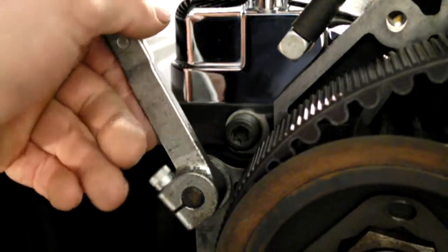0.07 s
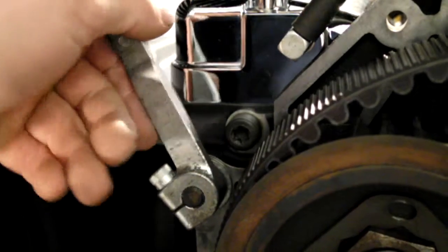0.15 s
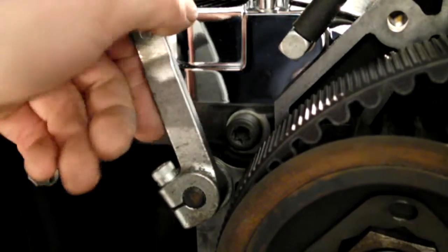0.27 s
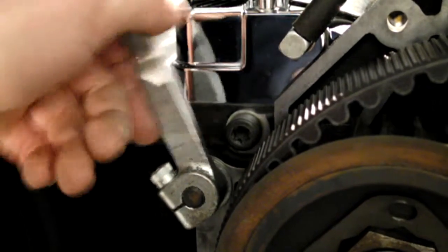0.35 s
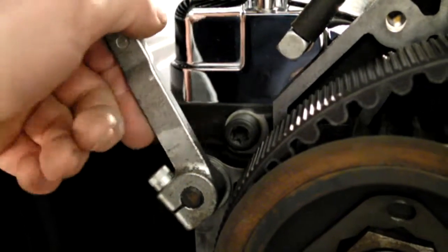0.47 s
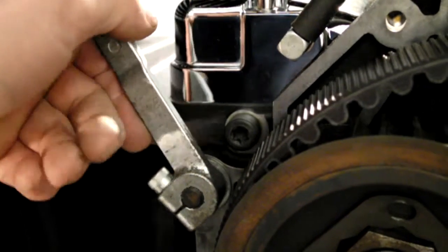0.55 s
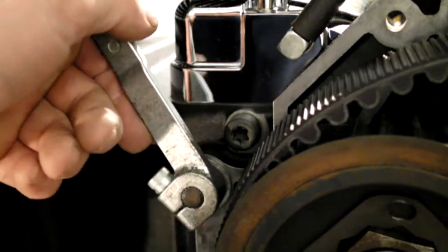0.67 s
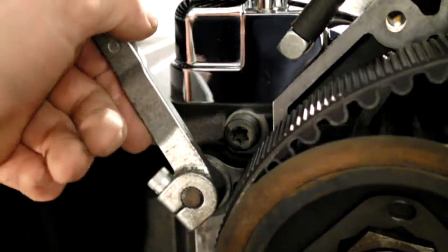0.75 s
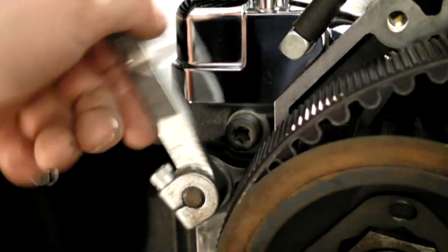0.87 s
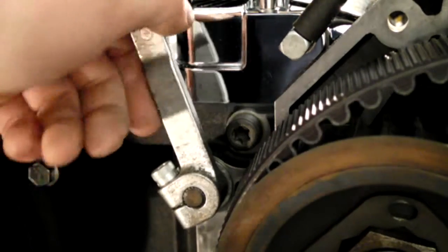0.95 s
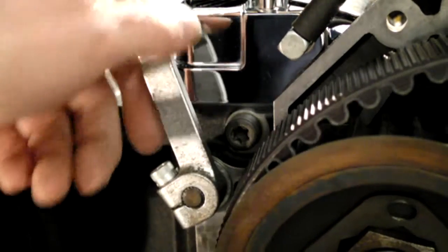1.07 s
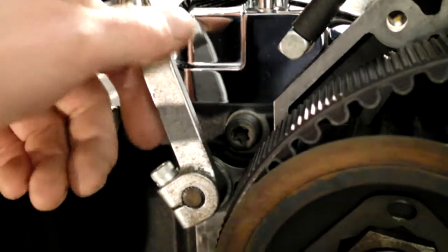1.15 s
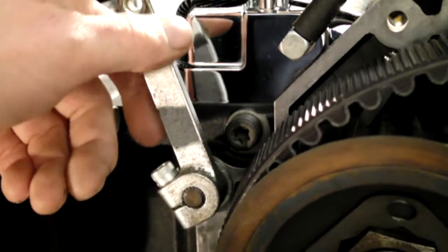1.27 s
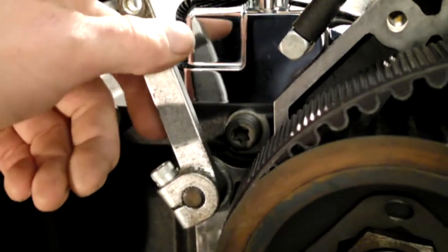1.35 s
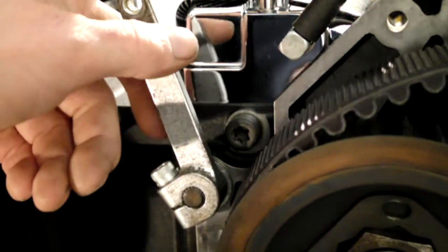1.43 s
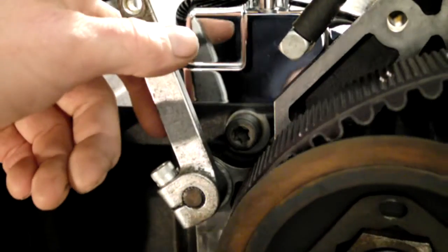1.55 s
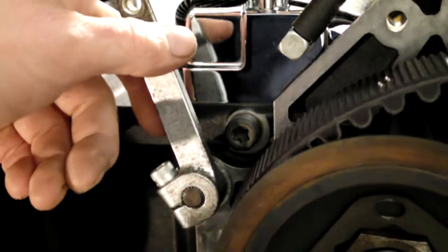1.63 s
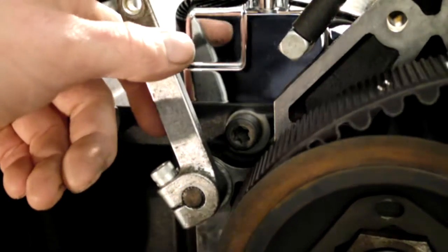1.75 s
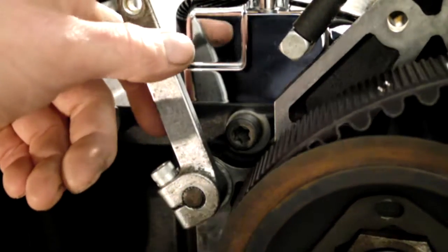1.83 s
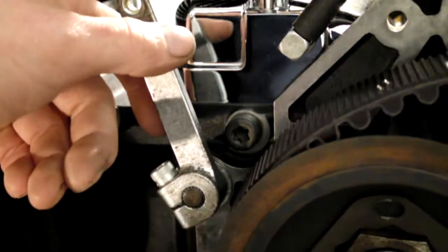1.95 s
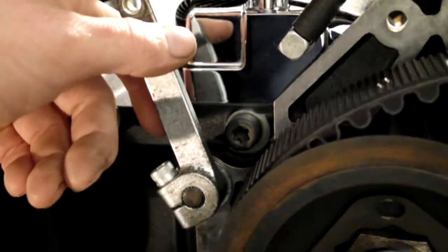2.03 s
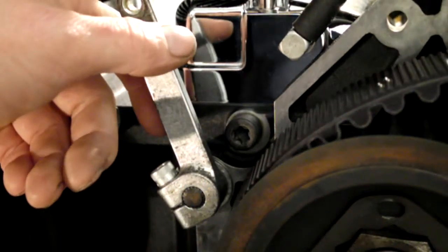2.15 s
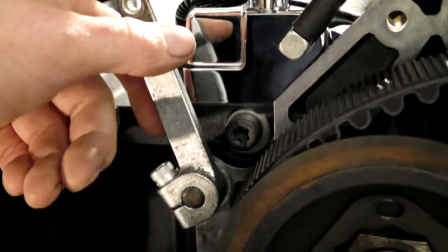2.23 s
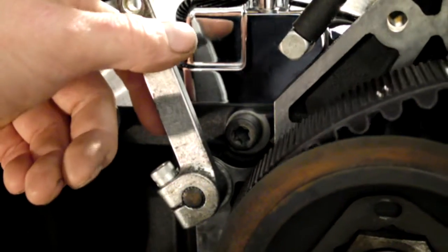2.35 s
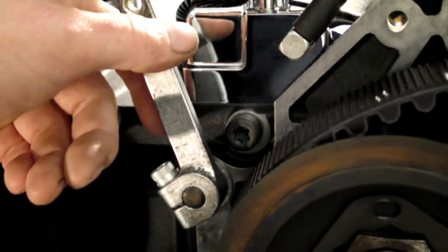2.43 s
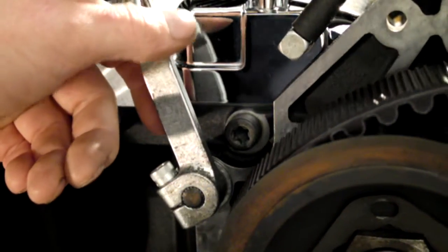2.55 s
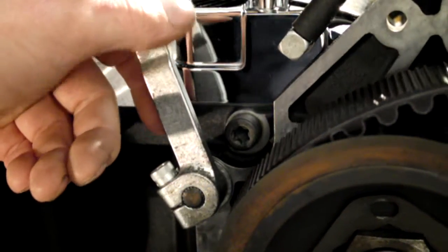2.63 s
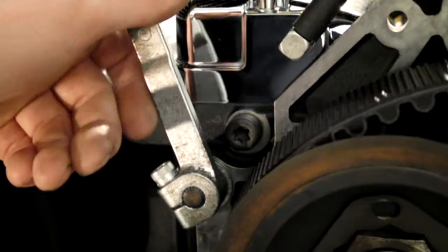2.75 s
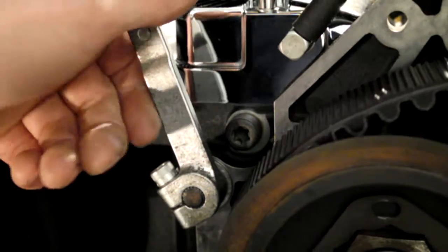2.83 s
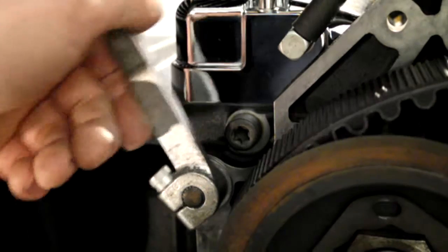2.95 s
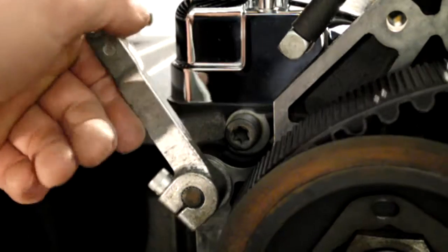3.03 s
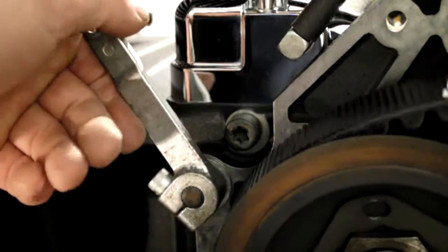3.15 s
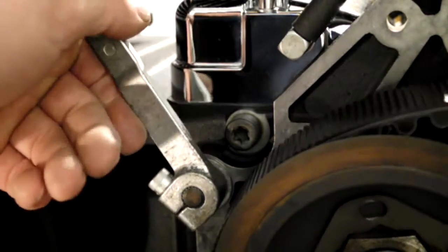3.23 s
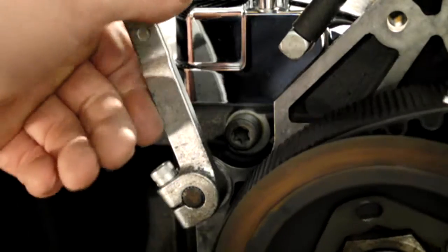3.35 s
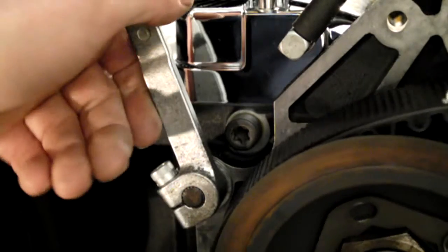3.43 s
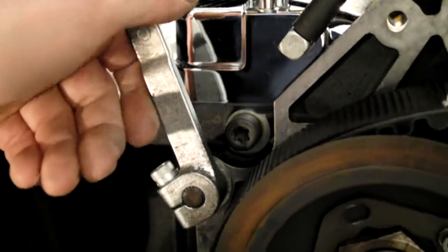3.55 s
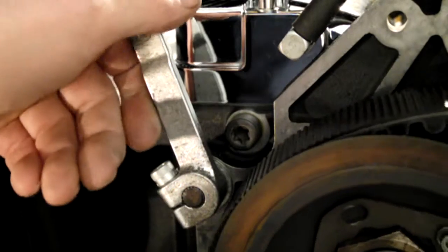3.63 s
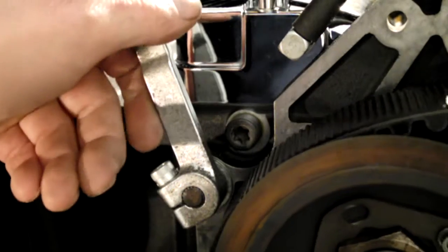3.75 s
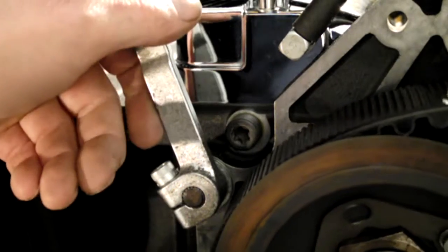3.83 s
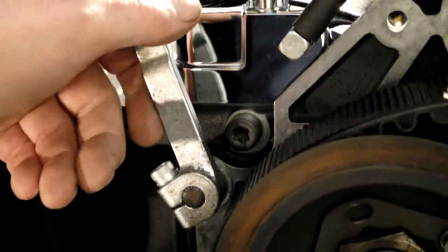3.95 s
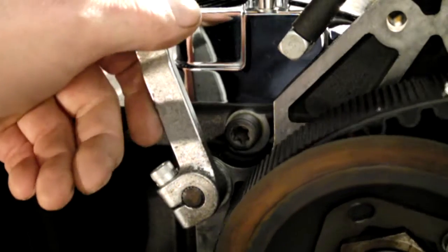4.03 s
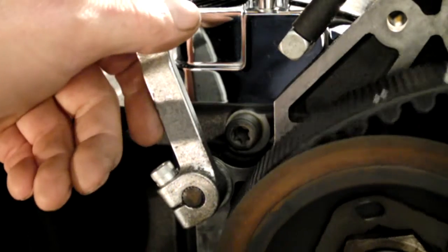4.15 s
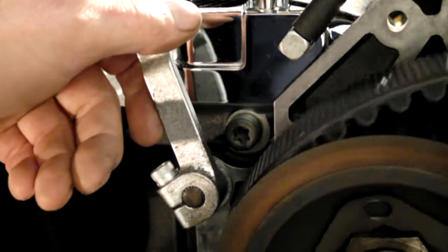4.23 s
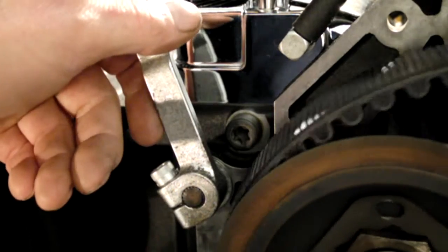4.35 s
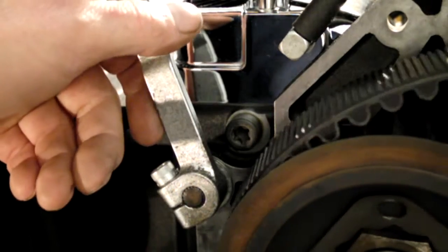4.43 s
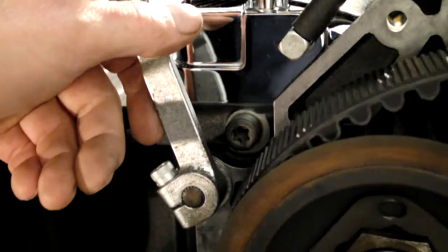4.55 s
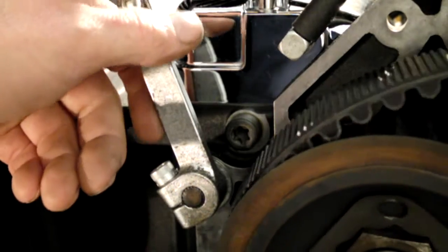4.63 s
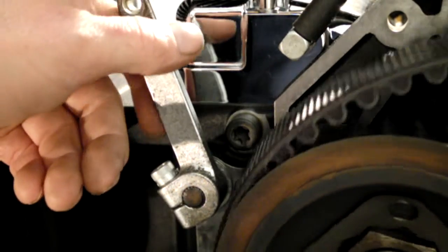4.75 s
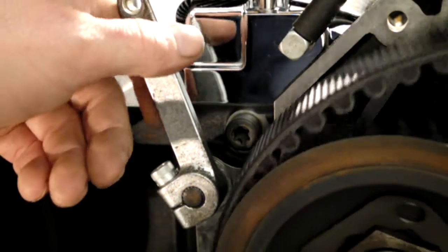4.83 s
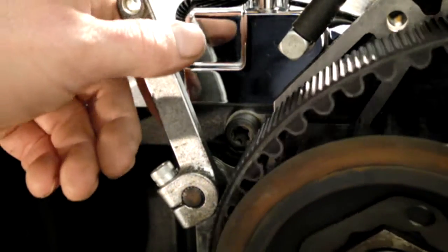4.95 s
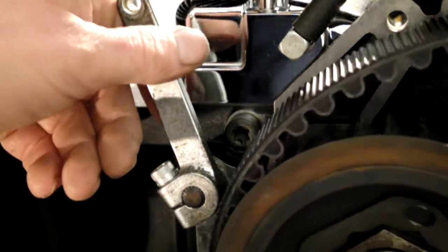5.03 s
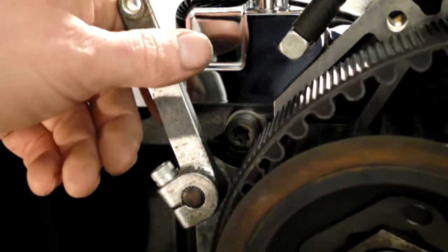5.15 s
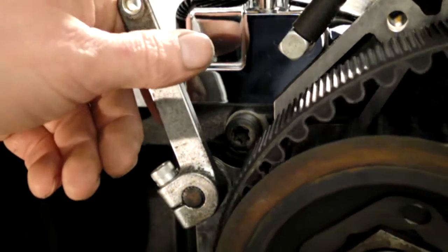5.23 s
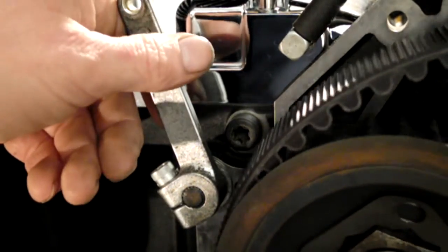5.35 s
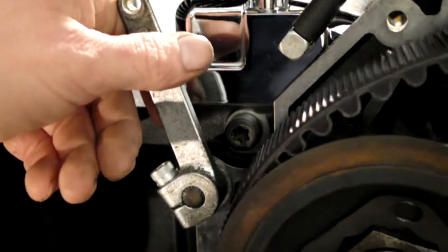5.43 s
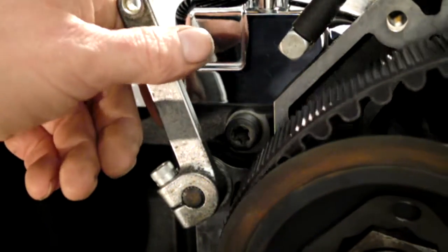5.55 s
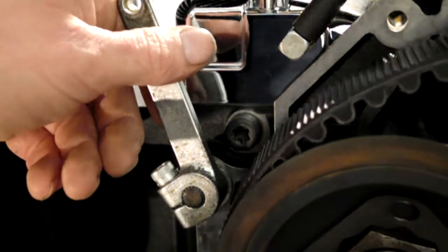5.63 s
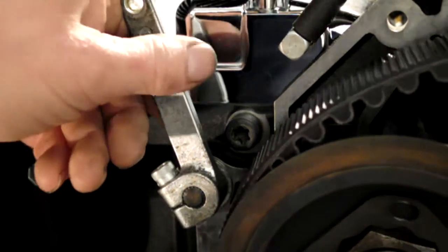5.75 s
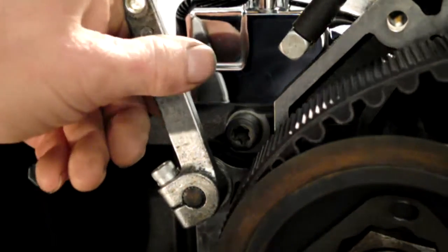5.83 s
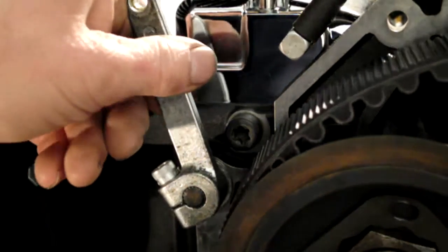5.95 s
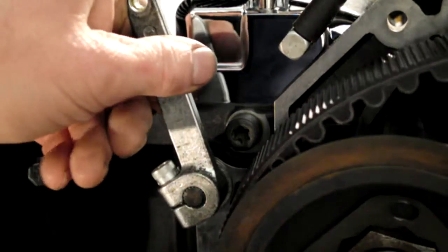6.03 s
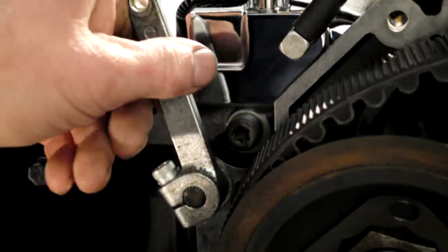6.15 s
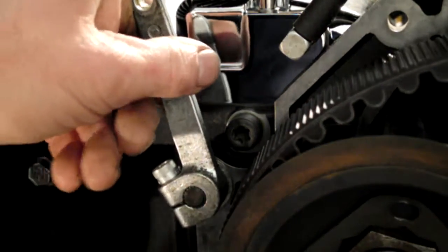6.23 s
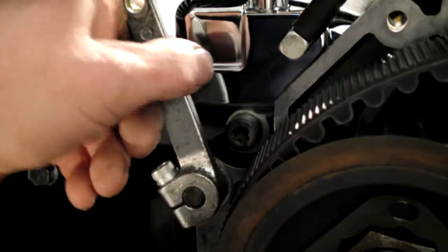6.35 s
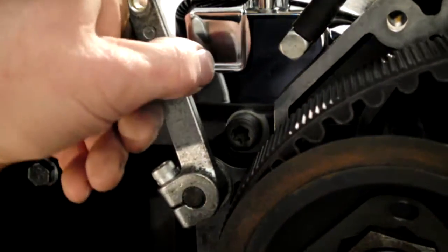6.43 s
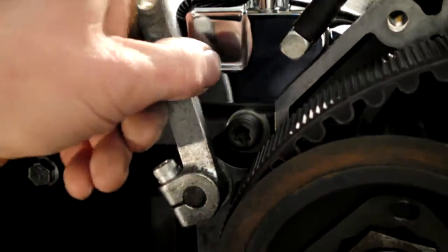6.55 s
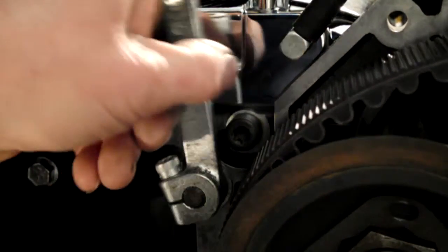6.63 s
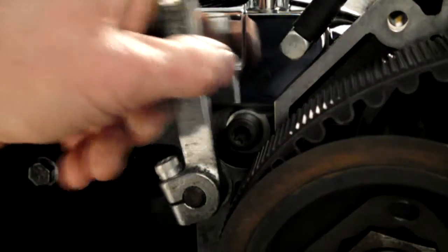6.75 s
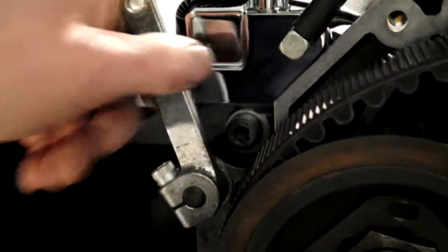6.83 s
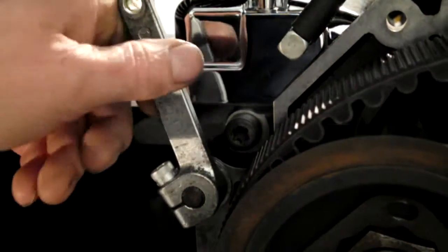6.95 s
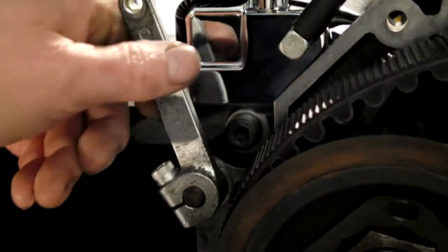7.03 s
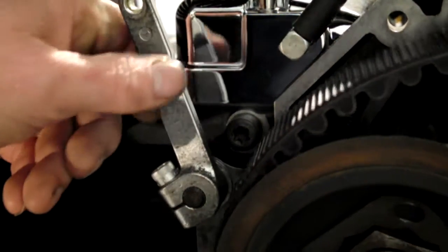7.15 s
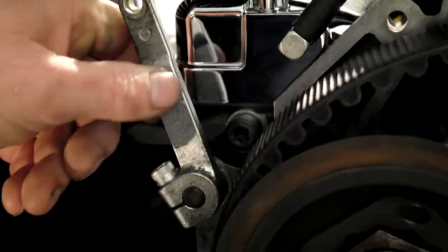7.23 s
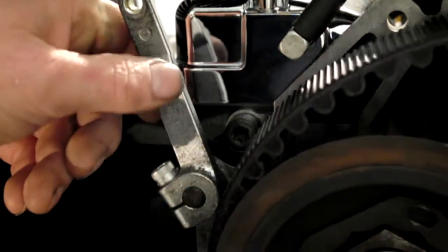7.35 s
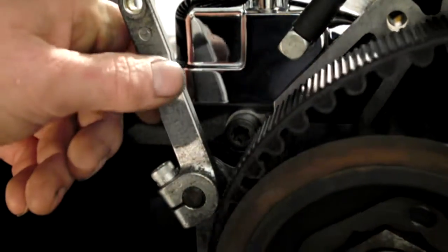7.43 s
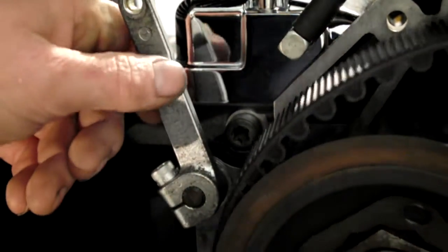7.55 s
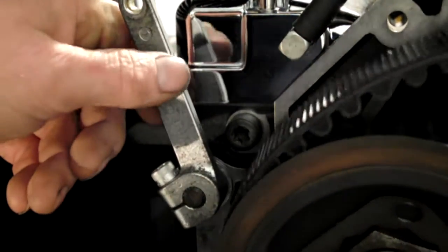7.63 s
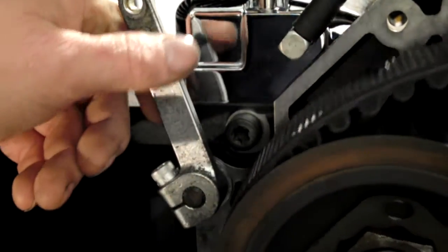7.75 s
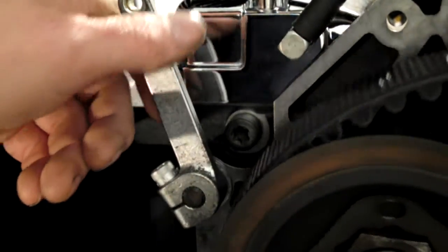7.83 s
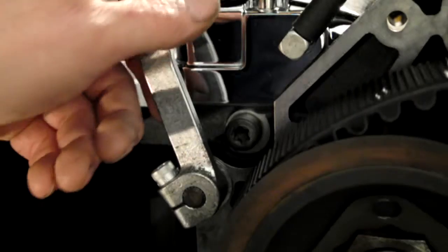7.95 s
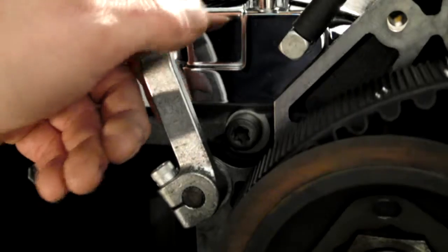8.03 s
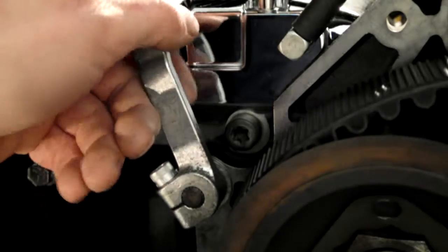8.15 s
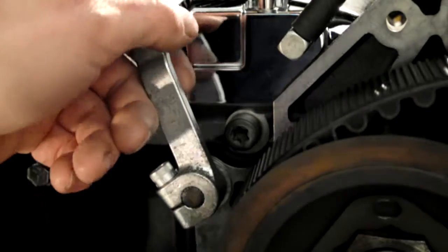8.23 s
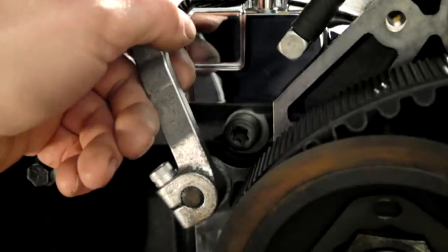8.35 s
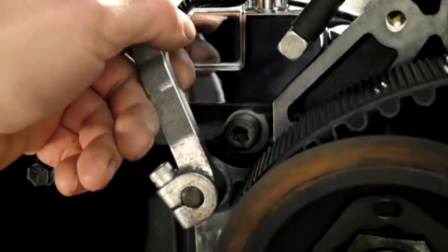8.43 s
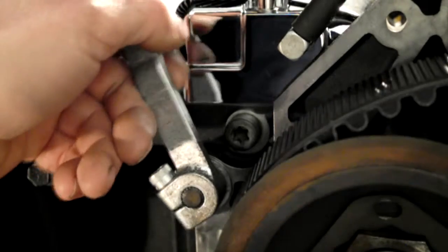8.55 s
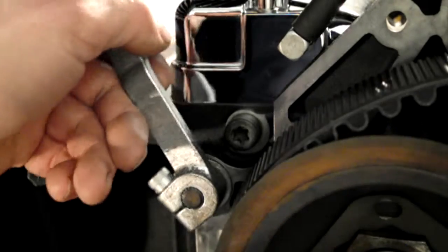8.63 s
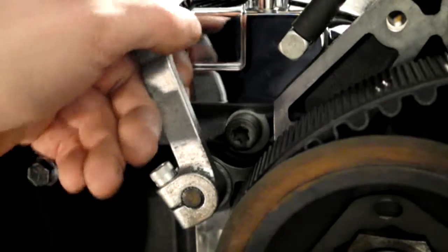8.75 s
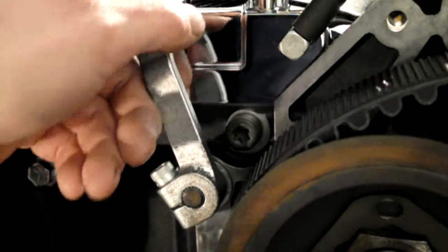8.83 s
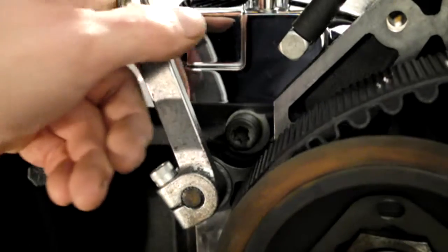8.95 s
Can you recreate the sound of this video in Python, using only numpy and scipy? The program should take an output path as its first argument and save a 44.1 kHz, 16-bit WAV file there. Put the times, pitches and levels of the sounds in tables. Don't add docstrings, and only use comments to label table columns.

```python
import sys
import numpy as np
from scipy import signal
from scipy.io import wavfile
from scipy.ndimage import uniform_filter1d

SR = 44100
rng = np.random.default_rng(int(sys.argv[2]) if len(sys.argv) > 2 else 0)


def wav_out(sig):
    wavfile.write(sys.argv[1], SR, np.round(np.clip(np.atleast_2d(sig).T, -1, 1) * 32767).astype(np.int16))


def natural_amplitude(level_db):
    exponent = np.asarray(level_db, float) / 20
    return 10 ** exponent


N = 396018

# (frequency [Hz], level [dB per Hz])
HISS_SPECTRUM = [(710, -17), (1200, -13), (1590, -16), (1810, -10.5), (2620, -2.5), (3250, -8),
                 (3950, -5.5), (14200, -10.5), (15200, -13.5), (16000, -37)]
RUMBLE_SPECTRUM = [(12, -41.5), (20, 0.5), (38, -5.5), (74, -8.5), (135, -18), (360, -21), (396, -18.5),
                   (428, -21.5), (550, -24.5), (1040, -29.5), (1260, -27), (1560, -43), (2000, -32.5),
                   (2600, -74), (4400, -120)]
# (frequency [Hz], pitch wander [Hz], level [dB])
HUM_LINES = [(70, .12, 2), (63.8, .12, -9), (42.5, .3, -10), (100, .1, -10), (116, .3, -16), (85, .3, -19),
             (150, 2, -19), (200, .2, -19), (300, .3, -26.5), (400, .4, -19.5)]
# (frequency [Hz], correlation [0-1])
PORT_LIKENESS = [(40, .93), (130, .9), (300, .92), (700, .85), (1400, .5), (3000, .05), (15000, .02)]
# (frequency [Hz], left over right [dB])
PORT_LEAN = [(40, 5.5), (250, 6.5), (950, 4), (3800, 2), (15000, 0)]
# (time [s], level [dB])
MACHINE_LOAD = [
    (0, -2),
    (1, 1.5),
    (2.5, 0.65),
    (5, 1),
    (6, -4.5),
    (7, -5),
    (8, -2),
    (8.98, -3),
]
# (time [s], level reached [dB])
LEVEL_LIFTS = [
    (-.3, -66.5),
    (.55, -62),
    (3.2, -61.5),
    (6.45, -67),
    (6.75, -66.5),
    (7.2, -62.5),
    (8.8, -58.5),
]

# (frequency [Hz], time to fall 60 dB [s])
ROOM_DECAY = [(250, 0.61), (1000, 0.5), (3000, 0.36), (8000, 0.36), (14000, 0.057)]
# (frequency [Hz], level [dB])
ECHO_SPECTRUM = [(200, 7), (600, 3), (1100, 5), (1600, 1.5), (2200, 3.5), (3100, -1.5), (3900, -0.5),
                 (4900, -4), (6000, -0.5), (7800, -5), (9300, -2), (11000, -3), (14000, -3)]
# (frequency [Hz], share [0-1])
ECHO_LIKENESS = [(300, .75), (1000, .42), (4000, .1)]
# (frequency [Hz], width [Hz], depth [0-1])
SHELL_DIPS = [(1620, 320, .85), (4800, 450, .35)]

# (frequency [Hz], level [dB], time to fall 60 dB [s])
PAWL_MODES = [(1150, -0.5, 0.036), (1810, -2, 0.054), (2600, -6.5, 0.012), (3448, -11.5, 0.018),
              (3795, -1.5, 0.078), (5950, -5.5, 0.017), (6410, -4, 0.035), (7100, -2.5, 0.0057),
              (7300, -8.5, 0.024), (8980, 3.5, 0.016), (10600, -10, 0.014)]
DRUM_MODES = [(1088, 0.5, 0.044), (1940, 1.5, .04), (2280, -4.5, .04), (2900, -9, 0.022), (3500, 0, 0.058),
              (3930, 0, 0.11), (4130, -10.5, 0.073), (6140, 2, 0.01), (7250, -6.5, 0.011),
              (9304, -9, 0.039)]
TEETH_MODES = [(300, -12.5, 0.2), (423, 4, 0.35), (608, 8, 0.017), (908, 11, 0.16), (1828, 6, 0.1)]
CASE_MODES = [(170, -10.5, 0.15), (240, -2, 0.047), (284, 0.5, .09), (430, -12, 0.14), (530, -13, 0.09),
              (744, -3.5, 0.016), (922, 3, 0.066), (1240, 4, 0.019), (1755, 9.5, 0.021), (2340, 7.5, 0.024),
              (3870, -0.5, 0.029)]

# (time [s], peak [dB], share above the body [dB], body frequency [Hz])
CASE_SHAKES = [
    (.555, -20.5, -17, 850),
    (3.03, -40, -7.5, 346.6),
    (3.349, -41.5, -9.5, 322.6),
    (6.40, -55, 13.5, 500),
    (6.836, -33, -10.5, 900),
    (8.629, -44.5, -8, 300),
]
# (time [s], peak [dB], share above the body [dB], body frequency [Hz])
CASE_THUDS = [(0.553, -26, -7, 237), (0.575, -39, -5, 232), (1.567, -47.5, 8, 700), (2.361, -44, -2.5, 773),
              (4.273, -40.5, -12, 423), (4.701, -59, -20.5, 202), (6.543, -42.5, -9, 326),
              (6.659, -21.5, 2, 915), (7.082, -29.5, -5.5, 900), (7.705, -31.5, 3, 850),
              (7.712, -30.5, -28, 386), (7.868, -42.5, -24, 287), (8.898, -38.5, -4, 360)]
# (time [s], peak [dB], share above the body [dB])
TEETH_KNOCKS = [
    (4.123, -34.5, -13.5),
    (4.371, -33.5, -12.5),
    (4.88, -37, -11),
    (5.584, -56, 0.5),
    (7.206, -34.5, -12.5),
]
# (time [s], peak [dB], treble share [dB])
DRUM_DRAGS = [
    (3.045, -32, -3),
    (6.32, -44, -8),
    (6.39, -43, -14),
    (6.6, -32, -4),
    (8.63, -29.5, -24),
    (8.76, -32, -19),
]
# (time [s], peak [dB], bass share [dB], treble share [dB])
SLACK_SLIPS = [(.355, -70.5, -1, 19), (.93, -50, -19, 7), (2.93, -56, -22, -14), (3.022, -39, -8, -37),
               (4.10, -54, -12, -12), (4.84, -56.5, -10.5, -2.5), (6.583, -31, -3, 5),
               (6.669, -15.5, -13.5, -18.5), (8.609, -32.5, -9, 4.5), (8.728, -39.5, -2.5, -2),
               (8.747, -20, -18, -14.5), (8.755, -19.5, -33, -39), (8.79, -43.5, -24, 2.5)]
# (time [s], peak [dB], bass share [dB], treble share [dB])
DRUM_CLUNKS = [
    (0.7519, -50.5, 10.5, -4),
    (1.9794, -71.5, 2, 12.5),
    (4.4456, -43.5, -6, -28),
    (5.2994, -61, -15.5, 0),
    (6.3749, -30.5, -16.5, -17),
    (6.5945, -11, -16.5, -6),
    (6.657, -7, -21.5, -7.5),
    (6.7715, -20.5, -33, -23.5),
    (8.6207, -12.5, -41, -9.5),
]
# (time [s], peak [dB], bass share [dB], treble share [dB])
PAWL_SNAPS = [
    (0.2083, -44, -2, 7),
    (0.387, -25.5, -13.5, -16.5),
    (0.5407, -25, -12, -4),
    (0.9063, -34.5, -4, 3),
    (2.9828, -35, -18.5, -18.5),
    (3.038, -20.5, -24, -4.5),
    (3.277, -45, -0.5, -8),
    (3.3471, -11.5, -15, 3),
    (6.3091, -30.5, -20.5, -3.5),
    (6.8348, -11, -14.5, 4),
]

RISE_DB_PER_S, HOLD_S, SINK_DB_PER_S = 42, 0.24, 6
BASS_LAG_S = 0.25
HUM_DB, RUMBLE_DB, RUMBLE_FOLLOWS, MID_LEVEL_DB = 13.5, -61, 1.055, -66
HISS_PATCHY_DB, RUMBLE_PATCHY_DB = 0.8, 1.2
JOLT_S, JOLT_WIDTH_S, JOLT_DB = 6.68, 0.09, 11
BELT_HZ, BELT_WANDER_HZ, BELT_DB = 436, 2.5, -63
BELT_ON_S, BELT_OFF_S, BELT_EDGE_DB_PER_S = 7.25, 7.69, 260
# rattle [ms] at full force, extra rattle [ms] per dB softer, room share [dB]
SNAP, CLUNK, SLIP = (4, 0.17, -7), (7.8, 0.012, -7), (7.7, 0.01, -5.5)
KNOCK, THUD, SHAKE = (12, 0.015, -4.5), (5, 0.073, -6), (2.8, 0.08, -7)
DRAG = (55, 0.1, -12)
TEETH_BODY_HZ = 555
TAIL_S, TAIL_FOLLOWS = 0.15, 0.71
OVERLOAD_CEILING, EDGE_HZ = 0.75, 16000


def evened(x):
    return x / np.sqrt(np.mean(x ** 2) + 1e-20)


def read(points, hz):
    f, value = np.transpose(points)
    return np.interp(np.log(hz + 1), np.log(f + 1), value)


def automatic_level(t):
    s, db = np.transpose(LEVEL_LIFTS)[:, :, None]
    before = np.maximum(s - t, 0)
    after = np.maximum(t - s - HOLD_S, 0)
    return (db - RISE_DB_PER_S * before - SINK_DB_PER_S * after).max(0)


def noise(spectrum, lo_hz, hi_hz, patchy_db):
    frames, hz = N // 512 + 5, np.fft.rfftfreq(2048, 1 / SR)
    a, b, c, d, patches = rng.standard_normal((frames, 1025, 5)).T
    patches = evened(uniform_filter1d(uniform_filter1d(patches, 30, 0), 8, 1))
    same = read(PORT_LIKENESS, hz)[:, None]
    left = a + 1j * b
    right = same * left + np.sqrt(1 - same ** 2) * (c + 1j * d)
    z = np.array([left, right])
    z *= natural_amplitude(read(spectrum, hz)[:, None] + patchy_db * patches)
    z *= natural_amplitude(np.outer([0.5, -0.5], read(PORT_LEAN, hz)))[:, :, None]
    x = signal.istft(z, nperseg=2048, noverlap=1536)[1][:, :N]
    band_pass = signal.butter(4, [lo_hz, hi_hz], "bandpass", fs=SR, output="sos")
    return x / signal.sosfilt(band_pass, x.mean(0)).std()


def tone(hz, wander_hz, waver_db):
    slow = rng.standard_normal((2, N // 100 + 1))
    slow = uniform_filter1d(uniform_filter1d(slow, 40), 40)
    drift, swell = (np.interp(np.arange(N) / 100, np.arange(len(v)), evened(v)) for v in slow)
    phase = 2 * np.pi * np.cumsum(hz + wander_hz * drift) / SR
    return np.sqrt(2) * natural_amplitude(waver_db * swell) * np.sin(phase)


def hum():
    lines = sum(natural_amplitude(db) * tone(hz, wander_hz, 0.78) for hz, wander_hz, db in HUM_LINES)
    return lines * natural_amplitude([[2.1], [-2.1]])


def background():
    t = np.arange(N) / SR
    level = automatic_level(t)
    keep = np.exp(-1 / (BASS_LAG_S * SR))
    late = level[0] + signal.lfilter([1 - keep], [1, -keep], level - level[0])
    jolt = JOLT_DB * np.exp(-((t - JOLT_S) / JOLT_WIDTH_S) ** 2)
    hum_gain = natural_amplitude(HUM_DB + late + jolt + np.interp(t, *np.transpose(MACHINE_LOAD)))
    rumble_gain = natural_amplitude(RUMBLE_DB + 0.6 * jolt + RUMBLE_FOLLOWS * (level - MID_LEVEL_DB))
    hiss = natural_amplitude(level) * noise(HISS_SPECTRUM, 3300, 20000, HISS_PATCHY_DB)
    rumble = rumble_gain * noise(RUMBLE_SPECTRUM, 130, 1600, RUMBLE_PATCHY_DB)
    return hiss + hum_gain * hum() + rumble


def workshop(x):
    taps = np.zeros((3, SR))
    at = np.arange(150, SR - 20, 20) + rng.integers(0, 20, (3, (SR - 151) // 20))
    np.put_along_axis(taps, at, rng.choice([-1., 1.], at.shape), 1)
    hz, t, z = signal.stft(taps, SR, nperseg=256)
    alike = read(ECHO_LIKENESS, hz)[:, None]
    z = alike * z[2] + (1 - alike) * z[:2]
    decay_db = read(ECHO_SPECTRUM, hz)[:, None] - 60 * t / read(ROOM_DECAY, hz)[:, None]
    tail = signal.istft(z * natural_amplitude(decay_db), SR, nperseg=256)[1]
    tail = tail * natural_amplitude([[1.2], [-1.2]])
    return signal.fftconvolve(x[None], tail / np.linalg.norm(tail[0]), axes=1)[:, :N]


def resonate(x, hz, width):
    turn = np.exp(2j * np.pi * hz * np.arange(x.shape[-1]) / SR)
    r = np.exp(-np.pi * width / SR)
    return 2 * (turn * signal.lfilter([1 - r], [1, -r], x / turn)).real


def microphone_shell(x):
    for hz, width, depth in SHELL_DIPS:
        x = x - depth * resonate(x, hz, width)
    return x


def belt():
    t = np.arange(N) / SR
    outside = np.maximum(np.maximum(BELT_ON_S - t, t - BELT_OFF_S), 0)
    sung = natural_amplitude(BELT_DB - BELT_EDGE_DB_PER_S * outside) * tone(BELT_HZ, BELT_WANDER_HZ, 1.0)
    return sung * natural_amplitude([[2.1], [-2.1]])


def dull(upper_db, body_hz=TEETH_BODY_HZ):
    return [(0, min(0.71 * body_hz, 300), 1.61 * body_hz, 4.5), (upper_db, 1300, 3800, 2.5)]


def scrape(treble_db):
    return [(1, 1951.5, 2600, 2.5), (treble_db, 5400, 6600, 0.2)]


def bright(bass_db, treble_db):
    return [(bass_db - 9, 230, 620, 4.5), (bass_db, 620, 1450, 4.5), (-1.5, 1697, 4799, 5.0),
            (treble_db, 4700, 10000, 0.2), (treble_db - 10.5, 10000, 14200, 0.2)]


def band(x, lo_hz, hi_hz):
    y = signal.sosfilt(signal.butter(2, [lo_hz, hi_hz], "bandpass", fs=SR, output="sos"), x)
    return y / np.sqrt(uniform_filter1d(y[:2].mean(0) ** 2, 130).max())


def strike(modes, bands, rattle_ms, crack, longest_s):
    t = np.arange(SR // 4) / SR
    fall = np.exp(-t * 1000 / max(rattle_ms, 0.3)) * np.minimum(t / 0.0012, 1)
    rattle = rng.standard_normal((3, len(t))) * fall
    rattle[1] = 0.5 * np.roll(rattle[0], 1) + 0.75 * rattle[1]
    rattle[2] *= 0.4
    rattle[2, 0] = np.linalg.norm(rattle[0])

    hz, db, t60 = np.transpose(modes)[:, :, None]
    spot = rng.standard_normal((len(modes), 3))
    decay = natural_amplitude(db + 1.5 * spot[:, :1] - 60 * t / np.clip(t60, 0.005, longest_s))
    phase = 2 * np.pi * hz * (1 + 0.008 * spot[:, 1:2]) * t + spot[:, 2:]
    ring = (decay * np.sin(phase)).sum(0)
    shaken = signal.fftconvolve(rattle, ring[None], axes=1)[:, :len(t)]

    toward = np.array([[1], [1], [0.15]])
    sound = toward * evened(evened(ring) + 0.29 * evened(shaken)) + crack * evened(rattle)
    out = 0
    for k, (db, lo_hz, hi_hz, left_db) in enumerate(bands):
        gain = natural_amplitude(db + left_db * np.array([[0.5], [-0.5], [0]]))
        out = out + (-1) ** k * gain * band(sound, lo_hz, hi_hz)
    return out


def gearbox():
    out = np.zeros((3, N + SR))
    # events, kind, modes, crack level, longest ring [s], contact
    parts = [(PAWL_SNAPS, SNAP, PAWL_MODES, 1.3, 0.022, bright),
             (DRUM_CLUNKS, CLUNK, DRUM_MODES, 1.1, 0.03, bright),
             (SLACK_SLIPS, SLIP, DRUM_MODES, 1.5, 0.02, bright),
             (TEETH_KNOCKS, KNOCK, TEETH_MODES, 0.7, 0.06, dull),
             (CASE_THUDS, THUD, CASE_MODES, 1.1, 0.08, dull),
             (CASE_SHAKES, SHAKE, CASE_MODES, 1.1, 0.08, dull),
             (DRUM_DRAGS, DRAG, DRUM_MODES, 3, 0.04, scrape)]
    for events, (hard_ms, softer_ms, room_db), modes, crack, longest_s, contact in parts:
        for s, db, *colour in events:
            now, later = automatic_level(np.array([s, s + TAIL_S]))
            echo_db = room_db + TAIL_FOLLOWS * (later - now)
            sound = strike(modes, contact(*colour), hard_ms - softer_ms * db, crack, longest_s)
            start = round(s * SR)
            out[:, start:start + sound.shape[1]] += natural_amplitude([[db], [db], [db + echo_db]]) * sound
    return natural_amplitude(-4.5) * out[:2, :N], out[2, :N]


def scene():
    direct, send = gearbox()
    metal = direct + workshop(send) + belt()
    return microphone_shell(metal) + background()


def band_limit(x):
    return signal.sosfilt(signal.butter(12, 16350, fs=SR, output="sos"), x)


def record(dry):
    overloaded = OVERLOAD_CEILING * np.tanh(dry / OVERLOAD_CEILING)
    low_pass = signal.firwin(255, EDGE_HZ, fs=SR)[None]
    limited = signal.oaconvolve(overloaded, low_pass, "same")
    return band_limit(limited)


dry = scene()
out = record(dry)
wav_out(out)
```